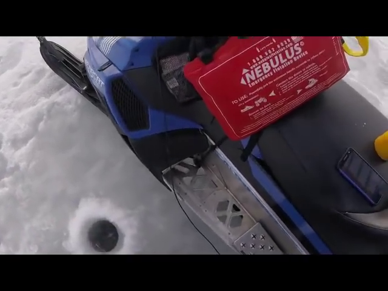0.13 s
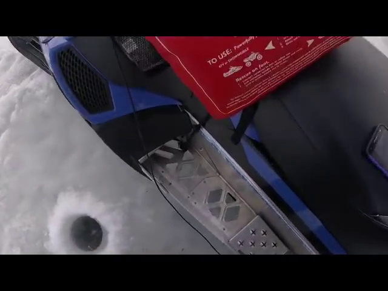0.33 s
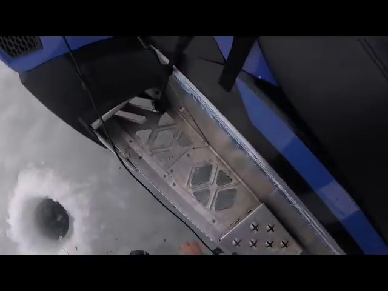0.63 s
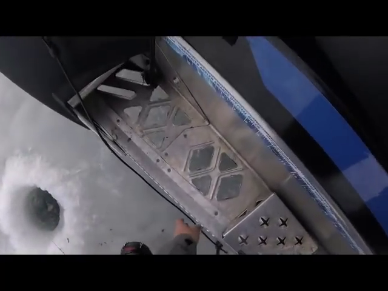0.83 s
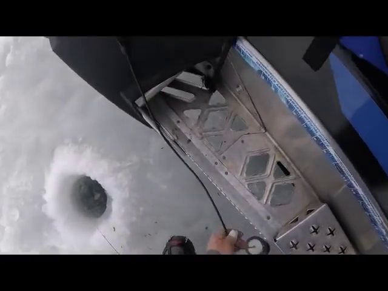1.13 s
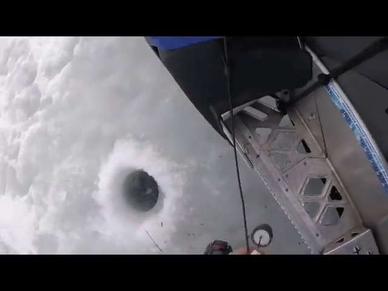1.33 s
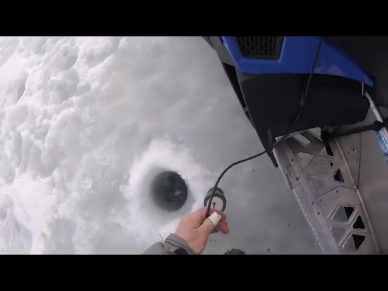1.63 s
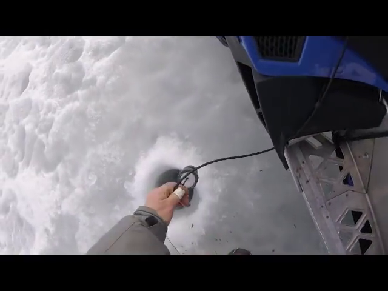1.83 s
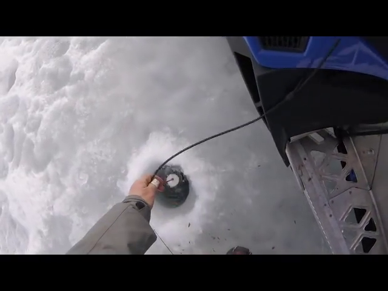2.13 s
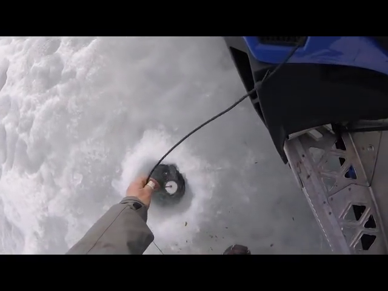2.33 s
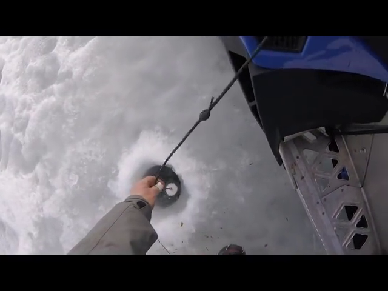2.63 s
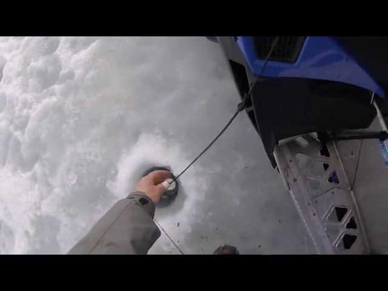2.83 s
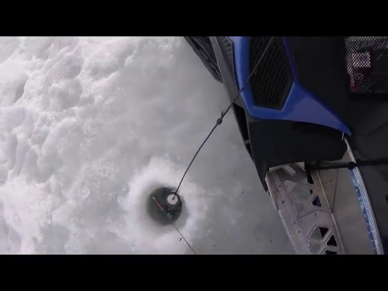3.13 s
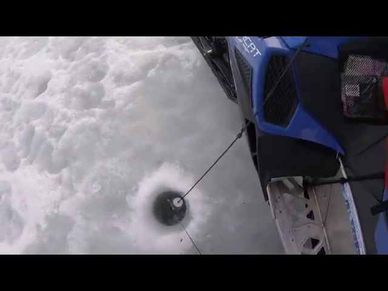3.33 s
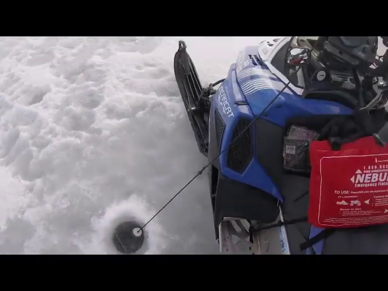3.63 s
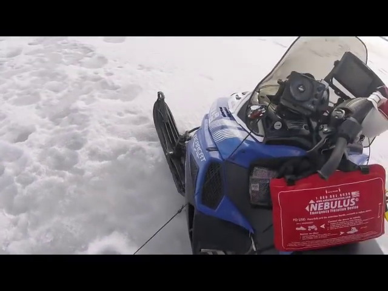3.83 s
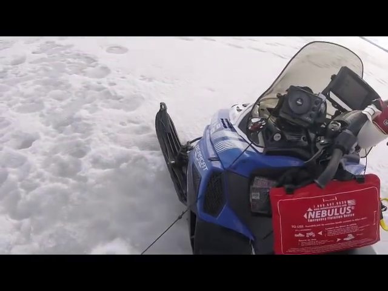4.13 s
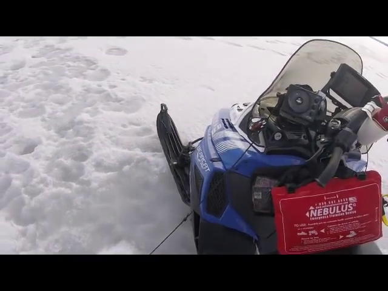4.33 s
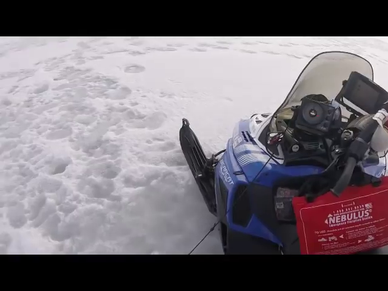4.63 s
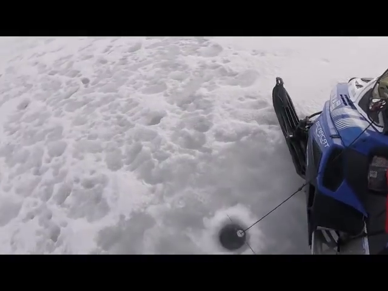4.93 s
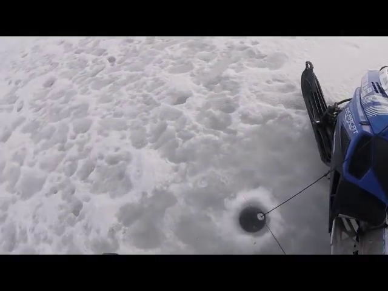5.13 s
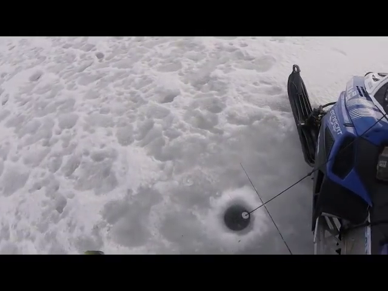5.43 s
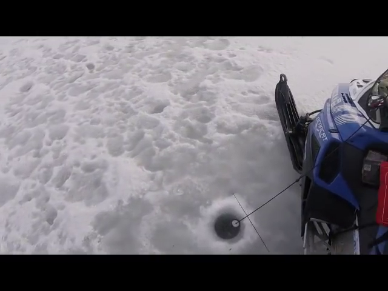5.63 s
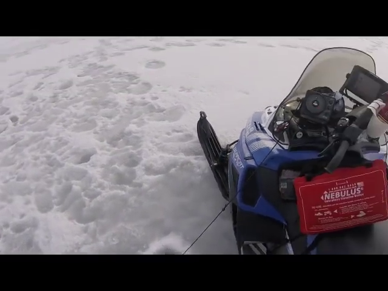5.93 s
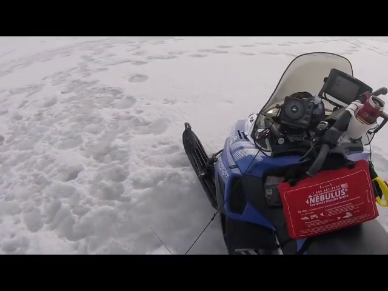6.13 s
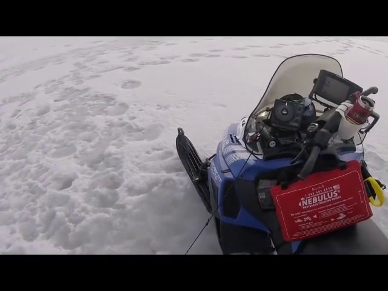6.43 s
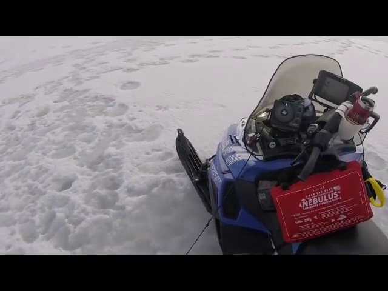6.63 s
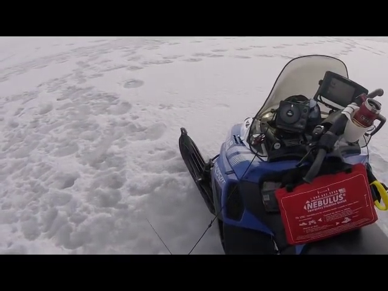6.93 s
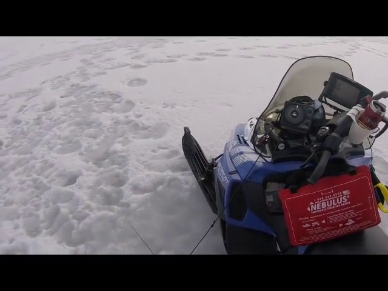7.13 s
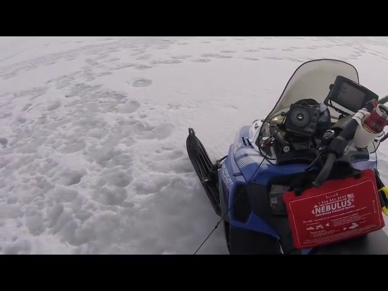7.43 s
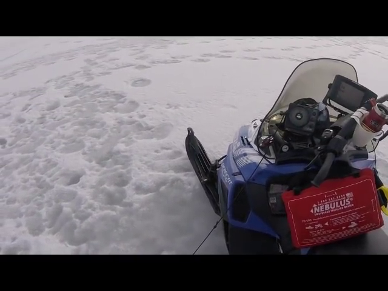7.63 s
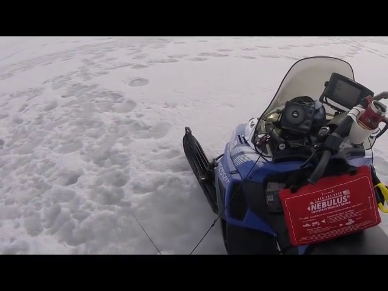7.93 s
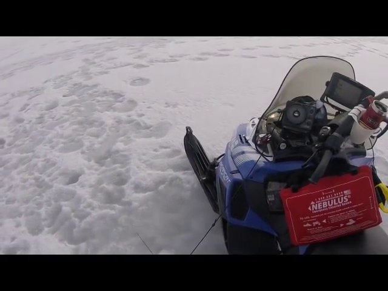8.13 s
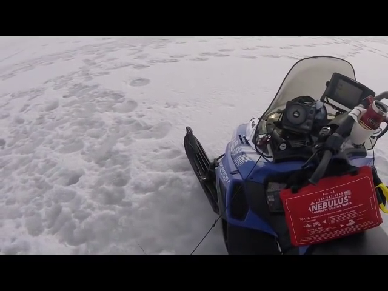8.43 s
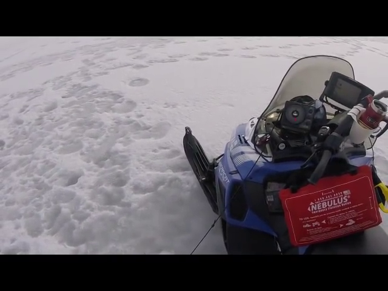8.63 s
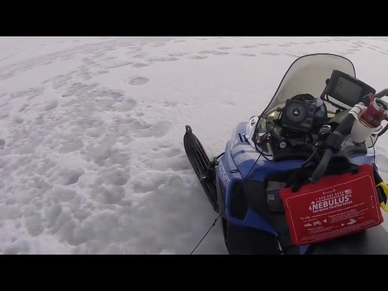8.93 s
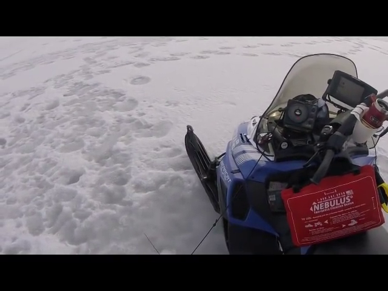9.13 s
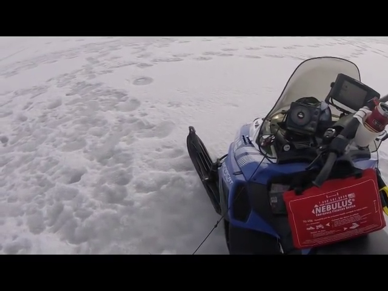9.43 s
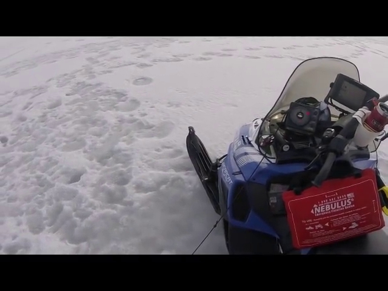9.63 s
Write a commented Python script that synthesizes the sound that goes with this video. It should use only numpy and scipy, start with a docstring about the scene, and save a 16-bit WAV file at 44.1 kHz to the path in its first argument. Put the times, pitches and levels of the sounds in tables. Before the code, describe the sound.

A snowmobile's twin-cylinder engine idles roughly throughout, about thirty low muffler thumps a second with irregular stronger pops, casing rattle and hissy panel buzz. A few hard knocks on the camera housing open it. The engine grows fuller and hollower as the head-worn microphone bends down, then recedes after three and a half seconds, with a short cable creak and jacket brush. Open frozen lake, dry, faint low wind.

```python
"""On lake ice, a twin-cylinder snowmobile idles unevenly beside a head-worn camera that bends close, then straightens.
The cylinders pump a resonant muffler in turn, each with its own thuds; only some turns burn well.
Noise gated in step with the ports makes the casing, gas and panel rattles; the footwell rings and a low drone ripples.
Decaying sines knock on the camera housing, rising chirps creak once as a cable, noise bursts make metal ticks
and jacket brushes, and low noise makes a light wind."""
import sys
import numpy as np
from scipy import signal
from scipy.fft import rfft, irfft, next_fast_len
from scipy.io import wavfile
from scipy.ndimage import uniform_filter1d

SR = 44100
rng = np.random.default_rng(int(sys.argv[2]) if len(sys.argv) > 2 else 0)


def put_to_file(sound):
    """Save the sound as 16-bit audio at rate SR, in the file named by the first command-line argument."""
    columns = np.atleast_2d(sound).T  # one column per channel
    safe = np.clip(columns, -1, 1)
    whole_steps = np.round(safe * 32767)
    wavfile.write(sys.argv[1], SR, whole_steps.astype(np.int16))


N = 431738


def undb(db):
    """Gain of a dB value."""
    return 10 ** (np.asarray(db) / 20)


def unit(x):
    """Scale to rms 1."""
    return x / np.sqrt(np.mean(x ** 2))


def ring(x, hz, width_hz):
    """Resonance with gain 1 at its centre."""
    return signal.lfilter(*signal.iirpeak(hz, hz / width_hz, fs=SR), x)


def ring_twice(x, hz, width_hz):
    """Two equal resonances in a row, for steeper skirts."""
    return ring(ring(x, hz, width_hz), hz, width_hz)


def ring_narrow(x, hz, width_hz):
    """A resonance of twice the width, then one of the width itself."""
    return ring(ring(x, hz, 2 * width_hz), hz, width_hz)


def walk(rate):
    """Random levels held 1 / rate s and slewed; spread near 1."""
    k = int(SR / rate)
    held = np.repeat(rng.standard_normal(N // k + 1), k)
    return 1.2 * uniform_filter1d(held, k)[:N]


def add(out, s, sound):
    """Mix a sound in at a time."""
    i = int(s * SR)
    out[i:i + len(sound)] += sound[:N - i]


# Path of the camera: (time [s], nearness to the machine [0-1], bend toward the footwell [0-1])
CAMERA_PATH = [(0, 0.8, 0.45), (.4, 0.72, 0.4), (.8, 0.75, 0.75), (1.5, 0.46, 0.84), (2.1, 0.6, 1),
               (3.1, 0.48, 1), (3.5, 0.23, 0.8), (3.8, 0.24, 0.55), (4.5, 0.22, 0.42), (5, 0.03, 0.47),
               (6.2, 0.1, 0.31), (7, 0, 0.28), (9.79, 0.04, 0.34)]


def camera_position():
    """Nearness and bend of the camera, which set how loud each engine layer arrives."""
    s, near, bend = np.transpose(CAMERA_PATH)
    t = np.arange(N) / SR
    return np.interp(t, s, near), np.interp(t, s, bend)


# Clear pops, the turns that burn well: (time of the blast [s], burn [0-1], swell of the rattles against usual [dB])
FULL_BURNS = [(0.1569, 0.68, 1.5), (0.1913, 0.82, -0.5), (0.4239, 0.91, 1.0), (0.4567, 0.71, -0.5),
              (0.5905, 0.7, 0.5), (0.6242, 0.81, -0.5), (0.7944, 0.74, -1.5), (0.8635, 0.83, -0.5),
              (1.0357, 0.87, -1.0), (1.1385, 0.91, -0.5), (1.3078, 0.79, 1.0), (1.3413, 0.76, -0.5),
              (1.5122, 0.93, 0.5), (1.8554, 0.74, -2.0), (1.8898, 0.8, -2.5), (1.9577, 0.76, 0.0),
              (2.0575, 0.85, 0.5), (2.1569, 0.98, 1.0), (2.3268, 0.94, 0.5), (2.5273, 0.93, 0.5),
              (2.6269, 0.76, -1.5), (2.728, 0.92, 0.0), (2.8277, 0.71, 0.0), (3.0304, 0.77, -2.0),
              (3.1663, 0.85, 0.5), (3.3678, 0.77, -1.0), (3.4013, 0.66, 0.0), (3.4682, 0.68, 0.0),
              (3.6417, 0.72, 4.0), (3.6779, 0.8, 3.0), (3.7123, 0.68, -1.5), (3.9206, 0.7, 7.0),
              (4.024, 0.68, 0.5), (4.196, 0.81, -1.5), (4.2308, 0.81, 1.0), (4.4711, 0.81, -1.5),
              (4.5737, 0.88, 0.5), (4.7736, 0.78, 1.0), (4.8401, 0.67, 1.5), (5.0453, 0.71, 1.5),
              (5.0798, 0.73, -0.5), (5.2158, 0.69, -0.5), (5.3881, 0.93, 0.0), (5.4872, 0.79, 1.5),
              (5.7275, 0.88, -0.5), (5.7608, 0.79, 0.0), (5.9945, 0.96, -0.5), (6.0921, 0.9, 0.0),
              (6.1916, 0.69, 1.0), (6.2591, 0.87, 2.0), (6.3573, 0.83, 1.5), (6.4555, 1.01, -0.5),
              (6.6239, 0.96, 0.0), (6.658, 0.73, 0.5), (6.8983, 0.89, -2.0), (7.001, 0.69, 0.0),
              (7.139, 0.7, 1.5), (7.2437, 0.78, -0.5), (7.3497, 0.88, 1.0), (7.3835, 0.86, 0.5),
              (7.5542, 0.72, 0.0), (7.6577, 0.73, -1.0), (7.7618, 0.84, 1.0), (7.796, 0.76, -1.5),
              (7.9705, 0.74, -0.5), (8.0405, 0.77, 1.5), (8.2124, 0.67, -1.0), (8.3199, 1.01, 0.0),
              (8.353, 0.66, 0.0), (8.5256, 0.7, 0.0), (8.5947, 0.78, 0.0), (8.6976, 0.9, -1.0),
              (8.7995, 0.87, 0.5), (8.9041, 0.96, 0.0), (8.9385, 0.72, 1.0), (9.11, 0.71, -1.0),
              (9.2156, 0.81, 0.0), (9.2502, 0.72, -1.0), (9.3899, 0.68, -1.0), (9.4249, 0.76, -0.5),
              (9.5298, 1.06, -2.0)]
IDLE_HZ = 29.3  # nominal turns per second
WEAK_TOP, WEAK_SKEW = .68, 1.35  # largest random burn before fouling, exponent toward small burns
# a good burn fouls the charge of the turns around it and hurries the crank through its own turn
FOULING, QUICKENING = .07, .07
TURN_JITTER_S = .001


def turns():
    """Time, burn, cylinder and set swell of every turn; partial, random burns fill the gaps between full ones."""
    s, strong, swell_db = np.transpose(FULL_BURNS)
    index = np.r_[0, np.cumsum(np.round(np.diff(s) * IDLE_HZ))]
    every = np.arange(-7, index[-1] + 9)
    weak, late = rng.uniform(0, 1, (len(every), 2)).T
    full = np.isin(every, index)

    burn = WEAK_TOP * weak ** WEAK_SKEW
    burn[full] = strong
    neighbours = [1, 1, 1, 0, 1, 1, 1]
    fouled = FOULING * np.convolve(burn - burn.mean(), neighbours, "same")
    burn = np.where(full, burn, np.clip(burn - fouled, 0, strong.min()))

    # full burns pin the clock; the turns between them share out the time
    clock = np.cumsum(np.r_[0, 1 - QUICKENING * (burn[:-1] - burn.mean())])
    outside = clock - np.clip(clock, clock[full][0], clock[full][-1])
    times = np.interp(clock, clock[full], s) + outside / IDLE_HZ
    times = times + TURN_JITTER_S * (2 * late - 1) * ~full

    set_db = np.full(len(every), np.nan)
    set_db[full] = swell_db
    second = every % 2 == 0
    return times, burn, second, set_db


def train(times, size, count=N):
    """One impulse a turn."""
    out = np.zeros(count)
    i = np.round(times * SR).astype(int)
    inside = (i >= 0) & (i < count)
    out[i[inside]] = size[inside]
    return out


LEAD_S = .1  # the muffler already runs before the start


def muffler(times, size, modes, start_ms, length_ms, back_ms, back):
    """A smooth push and its inverted return from the pipe end ring the muffler."""
    push = np.hanning(int(length_ms * SR / 1000))
    lead = int(LEAD_S * SR)
    start = times + LEAD_S + start_ms / 1000
    kicks = train(start, size, count=N + lead)
    kicks += back * train(start + back_ms / 1000, size, count=N + lead)
    flow = np.convolve(kicks, push)[:N + lead]
    out = 0
    for hz, width_hz, gain, stages in modes:
        once = ring(flow, hz, width_hz)
        out = out + gain * (once if stages == 1 else ring(once, hz, width_hz))
    return out[lead:]


# Pushes into the muffler: (start from the blast [ms], length [ms], delay of the return [ms], return [signed share])
BLAST_PUSH = (-3.2, 6.8, 9.3, -.44)
PUMPING_PUSH = (-7.45, 10.0, 7.4, -1.3)
FRONT_PUSH = (-2, 4, 3.5, -3)  # the steep front of a hard burn
# Muffler resonances that each push rings: (centre [Hz], width of each stage [Hz], gain [signed], stages [count])
BLAST_RESONANCES = [(107.4, 149.4, 0.99, 2), (155.1, 23, -0.33, 2), (70.9, 32.5, -0.57, 1),
                    (196.8, 40, -0.28, 2)]
PUMPING_RESONANCES = [(75.3, 45, -.19, 2), (129.8, 52.5, 0.4, 2), (47, 11, -0.046, 1)]
FRONT_RESONANCES = [(203.5, 32, 0.089, 2)]


def muffler_thumps(times, burn, pump_luck):
    """Blasts follow the burn, pumping goes on regardless, and steep fronts grow with the burn squared."""
    blast = muffler(times, burn, BLAST_RESONANCES, *BLAST_PUSH)
    pumping = muffler(times, undb(1.1 * pump_luck), PUMPING_RESONANCES, *PUMPING_PUSH)
    front = muffler(times, burn ** 2, FRONT_RESONANCES, *FRONT_PUSH)
    return blast + pumping + front


def chassis_rocking(times, burn):
    """Each turn shoves the chassis once, harder when it burns; it rocks at the idle rate."""
    shove = train(times, 1 + 0.79 * burn)
    return undb(-38.5) * unit(ring_twice(shove, IDLE_HZ, width_hz=20))


CLOSING_MS = 13.25  # port closing, after the blast


def gate(times, burn, second, luck, steady, blast, burn_share, blast_ms, closing, closing_ms, second_db):
    """Loudness through each turn: a swell while the exhaust port blows, a jolt as it closes."""
    t = np.arange(SR // 20) / SR * 1000  # ms
    swell_size = (blast + burn_share * burn ** 2) * luck[0] * undb(second_db * (second - .5))
    swell_shape = (1 - np.exp(-t / 2.5)) * np.exp(-(t / blast_ms) ** 2)
    swell = np.convolve(train(times - .003, swell_size), swell_shape)
    jolt_shape = (1 - np.exp(-t / .8)) * np.exp(-t / closing_ms)
    jolt = np.convolve(train(times + CLOSING_MS / 1000, closing * luck[1]), jolt_shape)
    return steady + swell[:N] + jolt[:N]


def rattle(opening, colour, rings, grain_db):
    """Grainy noise let through by the ports, coloured by the part that it shakes."""
    shake = opening * undb(grain_db * walk(400)) * rng.standard_normal(N)
    hz, db = np.transpose(colour)
    size = next_fast_len(N)
    bins = np.fft.rfftfreq(size, 1 / SR) + 1  # 1 Hz up, so that the log exists
    colour_db = np.interp(np.log(bins), np.log(hz), db, -90, -90)
    broad = unit(irfft(rfft(shake, size) * undb(colour_db), size)[:N])
    narrow = sum(undb(d) * unit(ring_narrow(shake, f, w)) for f, w, d in rings)
    return unit(broad + narrow)


# Every gate below: (steady [share], blast [share], burn [share], blast fade [ms], closing [share], closing fade [ms],
# second cylinder over the first [dB])
# Every colour below: (frequency [Hz], relative gain [dB])
# Every set of rings below: (centre [Hz], width of the narrower stage [Hz], level against the broad noise [dB])
CASING_OPENING = (.7, .2, .25, 9, .2, 5, 4)
CASING_COLOUR = [(180, -33), (255, 4.5), (295, 2), (364, 1.5), (410, -2), (573, -0.5), (680, -13.5),
                 (780, -1), (870, -3.5), (1100, -4.5), (1300, -18), (1690, -35)]
CASING_PEAKS = [(405, 40, -14), (540, 35, -20), (612, 45, -16), (680, 55, -15), (873, 75, -13),
                (990, 70, -22)]


def casing_rattle(crank):
    """The engine casing shakes as a dull, mid-low noise."""
    return rattle(gate(*crank, *CASING_OPENING), CASING_COLOUR, CASING_PEAKS, grain_db=2.0)


# Port opening, colour and narrow rings of the gas; columns as for the casing
GAS_OPENING = (.3, .4, .65, 20, .5, 9, 5)
GAS_COLOUR = [(740, -43), (1250, -5.5), (1500, -3), (1760, -3), (2080, -13.5), (2240, -3.5), (3420, -8),
              (4190, -16), (4350, -39), (5660, -43), (9570, -120)]
GAS_PEAKS = [(1540, 90, -7.5), (2030, 55, -17), (2200, 45, -21), (2556, 50, -24), (2880, 110, -20),
             (4055, 24, -26)]


def gas_rush(crank, clumps):
    """Gas rushes through the ports as a fine-grained noise."""
    return rattle(clumps * gate(*crank, *GAS_OPENING), GAS_COLOUR, GAS_PEAKS, grain_db=0.15)


# Opening, colour and narrow rings of the intake reeds; columns as for the casing
REED_OPENING = (.08, .25, .6, 14, 1.5, 8, 8)
REED_COLOUR = [(4300, -40.5), (4750, -4), (5100, -5.5), (5500, -5.5), (5900, -6.5), (6300, -39)]
REED_PEAKS = [(5300, 260, -5)]


def reed_snaps(times, burn, second, luck):
    """The intake reeds snap shut once a turn, burn or not, with exaggerated luck."""
    opening = gate(times, burn, second, luck ** 1.5, *REED_OPENING)
    return rattle(opening, REED_COLOUR, REED_PEAKS, grain_db=.5)


# Port opening, colour and narrow rings of the panels; columns as for the casing
PANEL_OPENING = (.33, .25, .85, 27, .45, 5, 2)
PANEL_COLOUR = [(2530, -30.5), (4300, -6), (4950, 2.5), (5410, 1), (6040, -2.5), (6570, 1), (7120, -6),
                (7850, -8), (9830, -14.5), (11800, -29), (15400, -55), (22000, -120)]
PANEL_PEAKS = [(6440, 150, -16)]
REED_DB = -1.5  # against the panels


def panel_rattle(crank, clumps):
    """Thin panels rattle brightly with the ports, the reed snaps among them."""
    panels = rattle(clumps * gate(*crank, *PANEL_OPENING), PANEL_COLOUR, PANEL_PEAKS, grain_db=1.2)
    return unit(panels + undb(REED_DB) * reed_snaps(*crank))


# Thuds of the block: (cylinder [0 first, 1 second], delay after the blast [ms], centre [Hz],
# width of each stage [Hz], relative level [dB])
BLOCK_THUDS = [(1, -7.5, 268.5, 96, -5.5), (0, 2, 308.4, 67, -5.5), (1, -2.5, 480, 108, -8.5),
               (0, 7, 424, 76, -12.5), (1, 0, 870, 29, -16), (0, 16.5, 687, 91, -14.5),
               (1, 1, 1700, 54, -19.5)]
THUD_SCATTER_DB, THUD_SCATTER_MS = 2.5, .6


def block_thuds(times, second):
    """Short dull rings of the block, the same places in every cycle, never quite the same size."""
    chance = rng.standard_normal((len(times), len(BLOCK_THUDS), 2))
    out = 0
    for k, (cylinder, ms, hz, width_hz, db) in enumerate(BLOCK_THUDS):
        own_turn = second == (cylinder > .5)
        size = undb(THUD_SCATTER_DB * chance[:, k, 0]) * own_turn
        delay_ms = ms + THUD_SCATTER_MS * chance[:, k, 1]
        blows = train(times + delay_ms / 1000, size)
        out = out + undb(db) * unit(ring_twice(blows, hz, width_hz))
    return out


# Low drone, strong while the camera swings down past the machine and faint once more later:
# (time [s], level [dB], spacing of its ripples [Hz])
DRONE_PATH = [(.2, -54, 112), (.55, -44, 120), (.9, -40, 147), (1.3, -43, 146), (1.7, -47, 142),
              (2.2, -51, 140), (3.2, -56, 140), (3.7, -70, 140), (4.6, -70, 140), (5.1, -56, 140),
              (5.6, -55, 140), (6.1, -75, 140)]
DRONE_CENTRE_HZ, DRONE_BAND_HZ, DRONE_ECHO = 480, 750, .85  # echo gain


def drone(shake):
    """The casing and block heard again off the ice: two echoes whose lag slides make sliding ripples."""
    t = np.arange(N) / SR
    s, db, spacing_hz = np.transpose(DRONE_PATH)
    lag = 1 / np.interp(t, s, spacing_hz)
    echoes = sum(DRONE_ECHO ** k * np.interp(t - k * lag, t, shake) for k in (1, 2))
    band = unit(ring_twice(shake + echoes, DRONE_CENTRE_HZ, DRONE_BAND_HZ))
    return undb(np.interp(t, s, db)) * band


# Upper rings of the footwell: (centre [Hz], width of the narrower stage [Hz], level against the main ring [dB])
FOOTWELL_UPPER_RINGS = [(1405, 82, -10.5), (1960, 206, -8.5), (2113, 49, -11.5)]
FOOTWELL_HZ, FOOTWELL_WIDTH_HZ = 685, 115


def footwell(casing, block, gas):
    """The hollow footwell rings with casing and block; the gas shakes its upper rings."""
    well = unit(ring_narrow(casing + block / 4, FOOTWELL_HZ, FOOTWELL_WIDTH_HZ))
    for hz, width_hz, db in FOOTWELL_UPPER_RINGS:
        well += undb(db) * unit(ring_narrow(gas, hz, width_hz))
    return well


# Layer levels: (standing back [dB], gained when near [dB], gained when bent over [dB])
MUFFLER_DB, CASING_DB, FOOTWELL_DB = (0, 4.5, 0), (-46.5, 3.5, 4.5), (-60, 1.5, 17)
GAS_DB, PANEL_DB, THUD_DB = (-52, 4, 7), (-52.5, 7, 2), (-48.5, 2, 3)
CLUMP_DB = .8  # slow swells of gas and panels


def engine():
    """Every engine layer runs on one crank and gets louder as the camera nears or bends."""
    near, bend = camera_position()

    def heard(layer, levels_db):
        """A layer at the level set by the camera position."""
        back_db, near_db, bend_db = levels_db
        return undb(back_db + near_db * near + bend_db * bend) * layer

    times, burn, second, set_db = turns()
    chance = rng.standard_normal((len(times), 3)).T
    # all parts feel the same uneven swells and jolts
    luck = undb(1.8 * chance[:2])
    luck[0] = np.where(np.isnan(set_db), luck[0], undb(set_db))
    crank = times, burn, second, luck
    clumps = undb(CLUMP_DB * walk(12))

    thump = muffler_thumps(times, burn, chance[2]) + chassis_rocking(times, burn)
    casing = casing_rattle(crank)
    gas = gas_rush(crank, clumps)
    panels = panel_rattle(crank, clumps)
    block = block_thuds(times, second)
    out = heard(thump, MUFFLER_DB) + heard(casing, CASING_DB)
    out += heard(gas, GAS_DB) + heard(panels, PANEL_DB) + heard(block, THUD_DB)
    out += heard(footwell(casing, block, gas), FOOTWELL_DB)
    return out + drone(casing + block)


def wind():
    """Light air rumbling at the microphone port: low noise of slowly wandering level."""
    rumble = unit(ring_twice(rng.standard_normal(N), 60, width_hz=150))
    return undb(-44 + 1.5 * walk(3)) * rumble


# Gear against the housing: (time [s], shell peak [dB], shell pitch [Hz], clasp ring against the shell [dB])
HOUSING_KNOCKS = [(.0175, -29, 1000, -30), (.0372, -24, 1210, -22), (.0788, -13.5, 950, -11),
                  (.1268, -22, 1160, -24), (.133, -30, 1780, -12), (.1692, -13, 800, -25),
                  (1.1071, -16, 640, -30), (2.307, -27, 900, -14)]
SHELL_T60_CYCLES = 4.0
BODY_HZ, BODY_DB, BODY_T60_S = 380, -8, .009  # level against the shell
CLASP_HZ, CLASP_T60_S, CLASP_SAG_PER_S, CLASP_ROUGH = 2050, 0.028, 12, .6  # start pitch, fade, pitch fall, flutter


def housing_knocks():
    """Each knock rings a short shell, a low body and a rough, sagging clasp."""
    out, t = np.zeros(N), np.arange(SR // 20) / SR
    clasp = np.sin(2 * np.pi * CLASP_HZ * (t - CLASP_SAG_PER_S * t ** 2 / 2))
    clasp *= (1 + CLASP_ROUGH * walk(1500)[:len(t)]) * undb(-60 * t / CLASP_T60_S)
    body = undb(BODY_DB) * np.sin(2 * np.pi * BODY_HZ * t) * undb(-60 * t / BODY_T60_S)
    for s, db, hz, clasp_db in HOUSING_KNOCKS:
        fade = undb(-60 * t * hz / SHELL_T60_CYCLES)
        shell = np.sin(2 * np.pi * hz * t) * fade * (1 - np.exp(-t * hz * 4))
        add(out, s, undb(db) * (shell / shell.max() - body + undb(clasp_db) * clasp))
    return out


# Brushes of the jacket: (time [s], length [s], level [dB], centre [Hz], part of the length before the peak [share])
JACKET_BRUSHES = [(0.403, 0.079, -49, 8000, 0.3), (2.103, 0.12, -42.5, 6000, 0.64),
                  (3.137, 0.14, -51, 7300, 0.4), (3.62, 0.33, -52, 7000, 0.26),
                  (3.882, 0.11, -39.5, 6200, 0.35)]
BRUSH_WIDTH_HZ, BRUSH_GRAIN_DB = 2800, 3


def jacket_brushes():
    """Grainy noise from rubbing fibres swells and fades in a high band."""
    out = np.zeros(N)
    for s, length, db, hz, rise in JACKET_BRUSHES:
        k = int(length * SR)
        phase = np.interp(np.arange(k) / k, [0, np.clip(rise, .1, .9), 1], [0, np.pi / 2, np.pi])
        fibres = undb(BRUSH_GRAIN_DB * walk(500)[:k]) * rng.standard_normal(k)
        hiss = unit(ring_twice(fibres, hz, BRUSH_WIDTH_HZ))
        add(out, s, undb(db) * np.sin(phase) ** 2 * hiss)
    return out


# Dry ticks of metal on metal: (time [s], level at the onset [dB], centre [Hz], width of each stage [Hz], fade [ms])
METAL_TICKS = [(.8545, -32, 6000, 3500, 1.6), (1.1072, -35, 4500, 7000, 1.6), (2.1955, -33, 6000, 5000, 3),
               (2.3057, -37, 5140, 4000, 2.5), (3.789, -46, 9100, 900, 4), (3.924, -33, 6500, 1500, 4),
               (6.5335, -42, 5300, 700, 6)]


def metal_ticks():
    """Bursts of banded noise that start at once and die within milliseconds."""
    out, t = np.zeros(N), np.arange(SR // 20) / SR
    for s, db, hz, width_hz, ms in METAL_TICKS:
        burst = unit(ring_twice(rng.standard_normal(len(t)), hz, width_hz))
        add(out, s, undb(db) * np.exp(-t * 1000 / ms) * burst)
    return out


# Slips of the cable that make one creak: (time [s], peak level [dB], start pitch [Hz], length [ms])
CABLE_SLIPS = [(3.6515, -30, 1050, 4), (3.657, -35, 1400, 3), (3.6635, -26, 1000, 5.5),
               (3.673, -28, 1150, 5), (3.6785, -34, 1500, 3), (3.6812, -26, 950, 4), (3.6865, -34, 1300, 3),
               (3.6948, -25, 1000, 5.5), (3.7015, -34, 1200, 3)]
SLIP_GLIDE, SLIP_ROUGH = 1.4, .5  # rise and waver, as shares of the pitch


def cable_creak():
    """The rubber grips unevenly, so each slip is a rising chirp that wavers."""
    out = np.zeros(N)
    for s, db, hz, ms in CABLE_SLIPS:
        u = np.linspace(0, 1, int(ms * SR / 1000))
        waver = uniform_filter1d(rng.standard_normal(len(u)), size=12)
        pitch = hz * (1 + SLIP_GLIDE * u) * (1 + SLIP_ROUGH * waver)
        chirp = np.sin(2 * np.pi * np.cumsum(pitch) / SR)
        add(out, s, undb(db) * np.sin(np.pi * u ** .4) * chirp)
    return out


def scene():
    """Everything at the one microphone."""
    handling = housing_knocks() + jacket_brushes() + metal_ticks() + cable_creak()
    return (engine() + wind() + handling)[None]


def record(dry):
    """The camera cuts the top: a steep low-pass at 11.8 kHz."""
    low_pass = signal.ellip(10, .2, 80, 11800, fs=SR, output="sos")
    return signal.sosfilt(low_pass, dry)


dry = scene()
out = record(dry)
put_to_file(out)
```